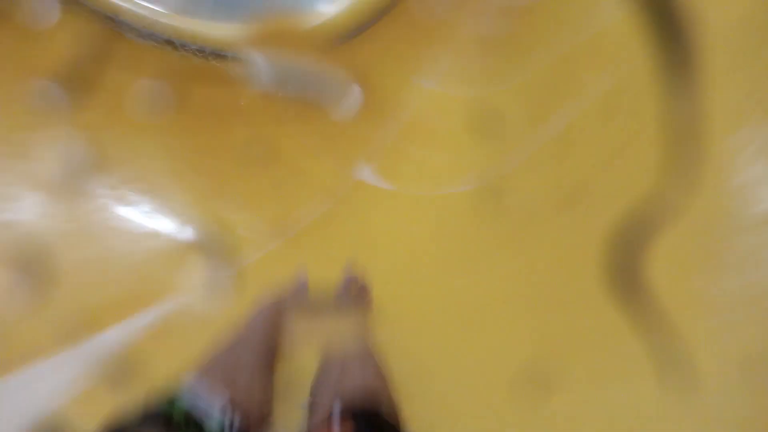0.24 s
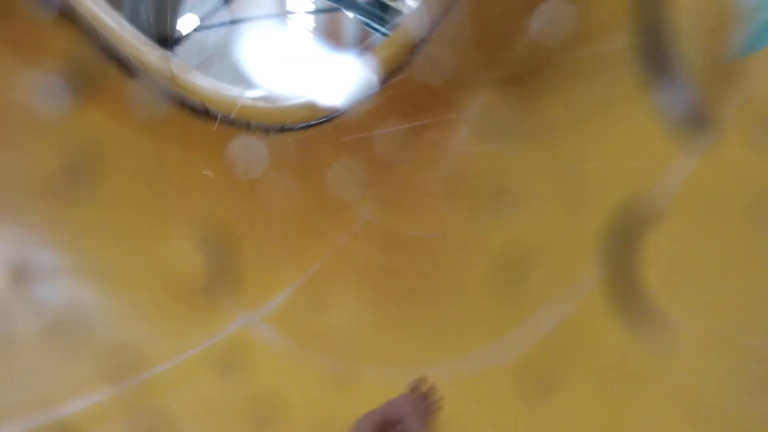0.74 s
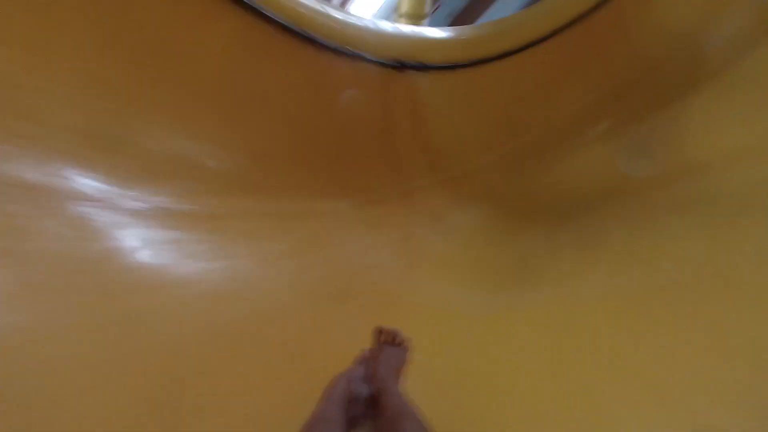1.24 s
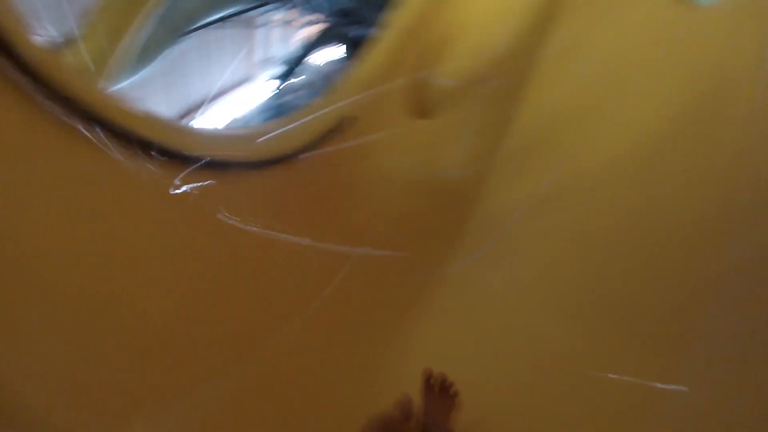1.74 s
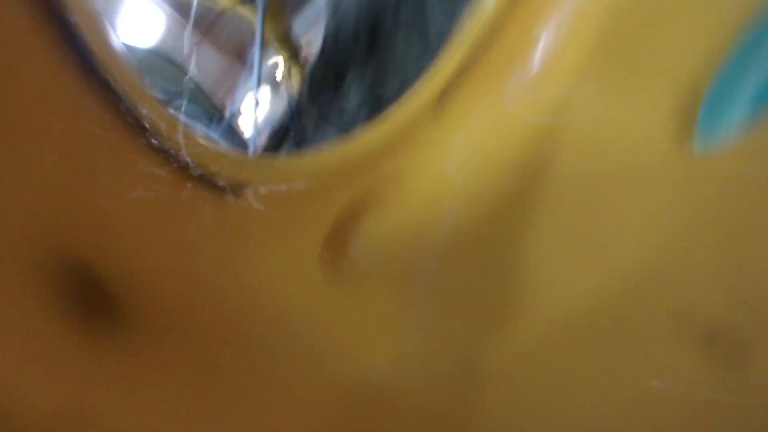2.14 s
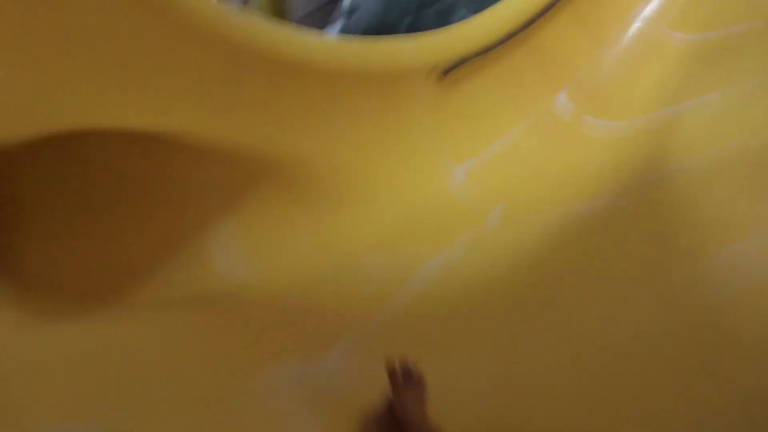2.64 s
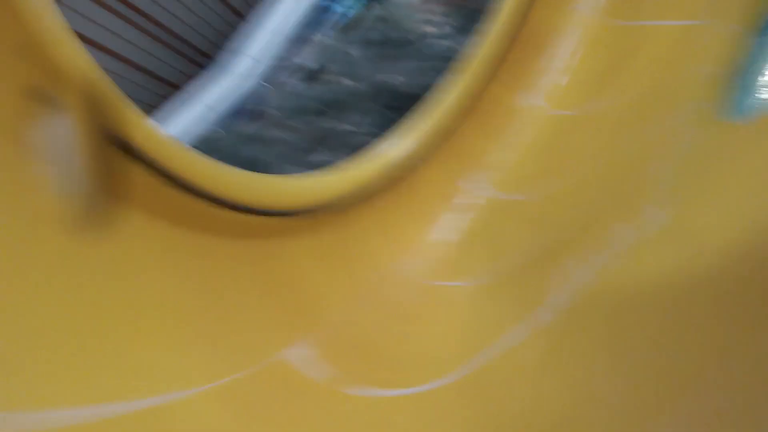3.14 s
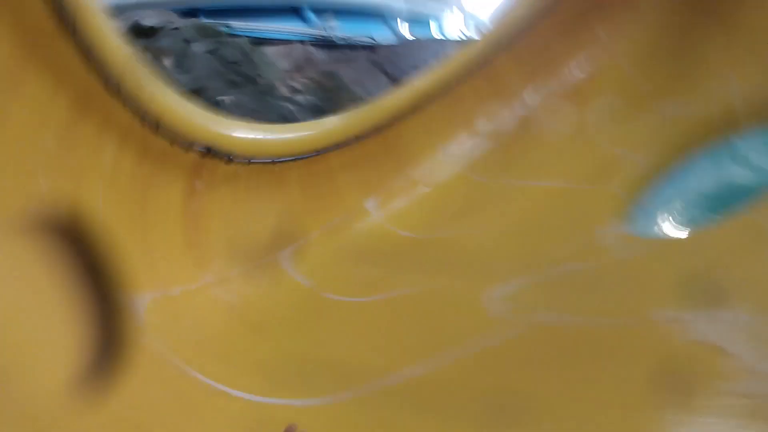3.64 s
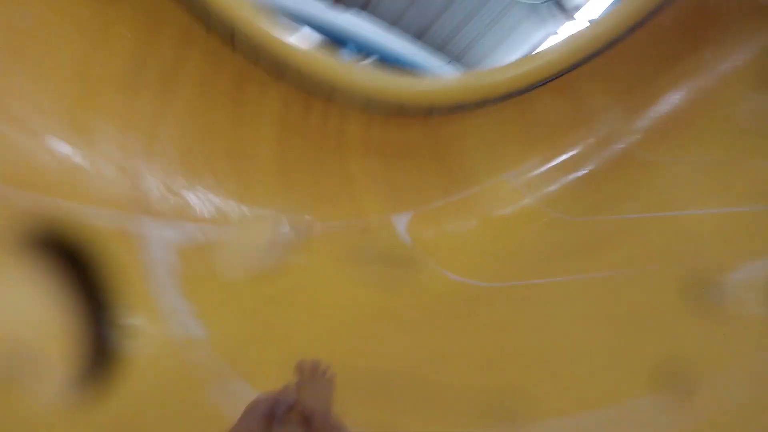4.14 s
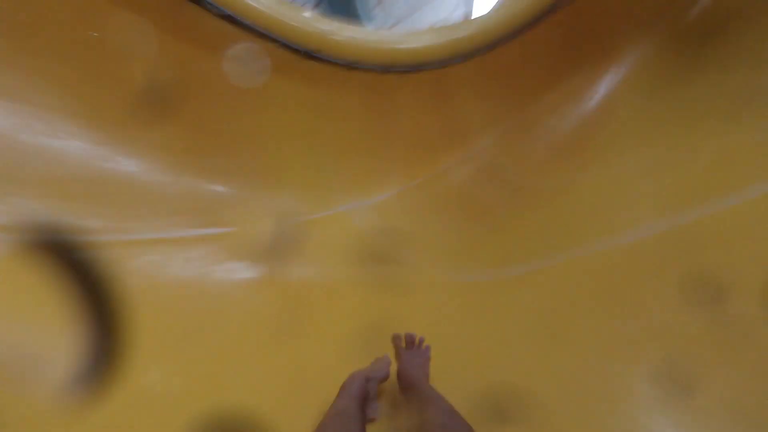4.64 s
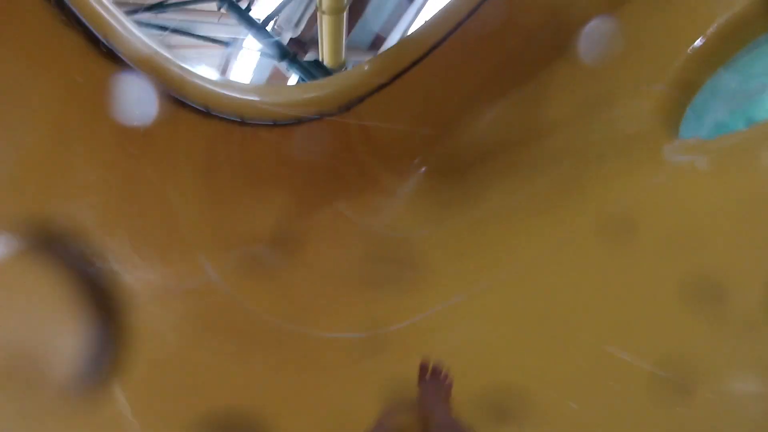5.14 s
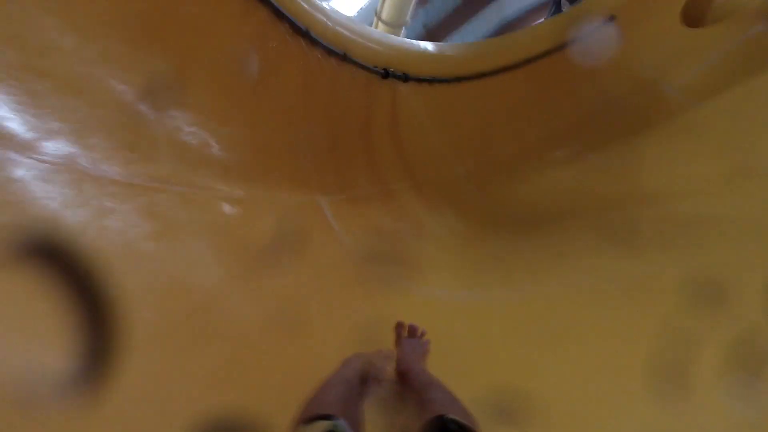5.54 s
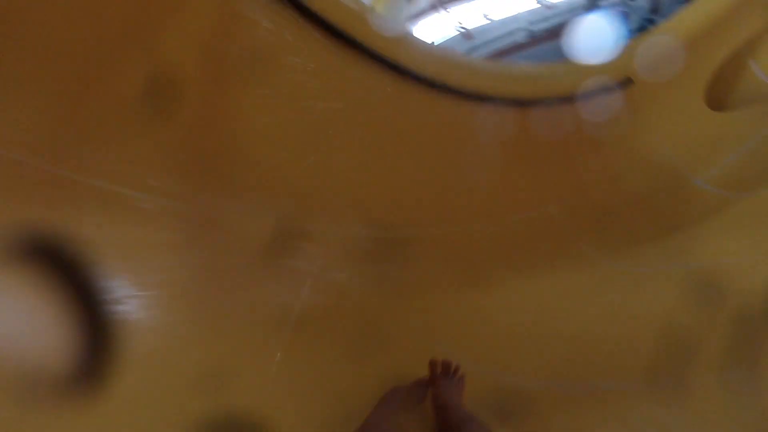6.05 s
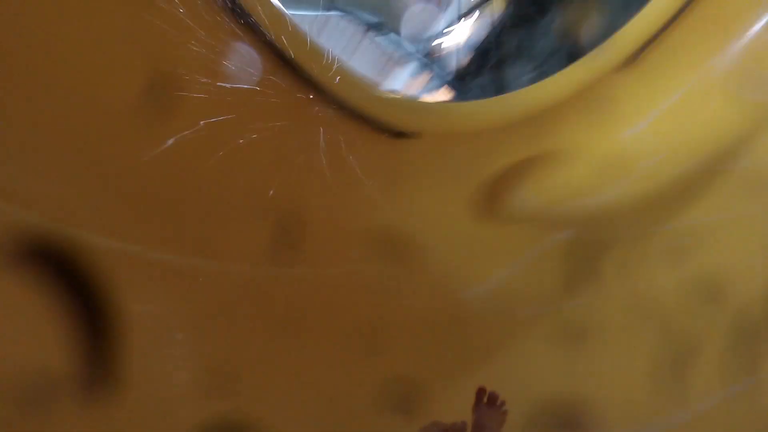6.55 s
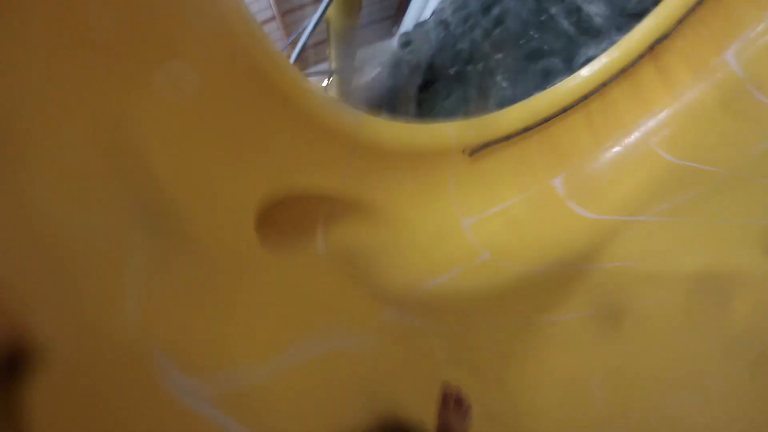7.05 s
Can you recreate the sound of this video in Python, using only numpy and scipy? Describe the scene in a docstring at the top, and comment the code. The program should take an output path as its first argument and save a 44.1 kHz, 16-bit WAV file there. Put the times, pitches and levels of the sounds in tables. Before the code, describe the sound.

A boxed-in microphone inside a sealed case rides round a plastic water-slide bowl; both channels are the same. Throughout, a faint muffled rush of water and a lumpy, very deep rumble rise and fall beneath fine ticking spray. A tight cluster of loud plastic smacks comes at 0.12-0.17 s, then mostly rumble, with a sharp knock at 0.9 and a barely audible thin whistle around 1.2-1.5. From 1.63 to 1.77 very hard, clipped pops strike, followed by scattered taps and a dense rattling flurry at 2.0-2.4. Heavy dull bumps land near 3.0 and 3.35. Light, sparse taps follow, a small clatter with a thump at about 5.0, and sharp pops around 5.4. Ticking spray thickens from 6 to 6.8, with a clear smack at 6.66 and hollow knocks clustering from 6.9 to 7.06, ending abruptly at about 7.3. Each hit is short, dry and hollow, momentarily pushing the background down.

```python
"""In a plastic water-slide bowl, a rider circles round holding a camera in a sealed housing.
Spray drops smack the housing and ring it: each is a short blow that sets off fading tones.
Behind them are a muffled rush of water (shaped noise), a deep rumble from the shaking ride (very slow
noise), a faint whistle, fine ticking spray and a few soft bumps. One microphone feeds both channels,
and a gain control turns loud moments down."""
import sys
import numpy as np
from scipy import signal
from scipy.fft import rfft, irfft
from scipy.io import wavfile
from scipy.ndimage import uniform_filter1d

SR = 44100
rng = np.random.default_rng(int(sys.argv[2]) if len(sys.argv) > 2 else 0)


def to_wav(s):
    """Save 16-bit WAV."""
    ch = np.atleast_2d(s).T  # columns
    pcm = np.round(np.clip(ch, -1, 1) * 32767)  # PCM
    wavfile.write(sys.argv[1], SR, pcm.astype(np.int16))


N = 321048  # length in samples


def gain_of(db):
    """Turn decibels into a plain multiplier."""
    return 10 ** (np.asarray(db) / 20)


def evened(x):
    """Scale a sound to an average (RMS) strength of 1."""
    return x / np.sqrt(np.mean(x ** 2) + 1e-20)


def peaked(x):
    """Scale a sound so that its largest swing is 1."""
    return x / abs(x).max()


def fading(t, t60_s):
    """Die away evenly in decibels, losing 60 dB in t60_s seconds."""
    return gain_of(-60 * t / t60_s)


def filtered(x, order, hz, kind):
    """Keep only the treble above hz ("high") or the range between two pitches ("band")."""
    return signal.sosfilt(signal.butter(order, hz, kind, fs=SR, output="sos"), x)


def read(points, hz):
    """Read a curve of (pitch, value) points at any pitch, evenly spaced in octaves."""
    point_hz, value = np.transpose(points)
    return np.interp(np.log(hz + 1), np.log(point_hz + 1), value)


def add(mix, start_s, sound):
    """Mix a sound in at its start time, cut off at the end of the scene."""
    part = mix[round(start_s * SR):][:len(sound)]
    part += sound[:len(part)]


def ride(column):
    """One column of the ride's course, joined by straight lines for every sample."""
    # how the ride goes: time_s, rush_db, rumble_db, specks_per_s (chance of fine spray)
    course = np.array([(0.0, -33, -17, 110), (0.2, -40, -10.5, 80), (0.7, -41, -21, 60),
                       (1.2, -43.5, -13, 45), (1.65, -40.5, -16.5, 48), (1.8, -44.5, -18, 23),
                       (1.95, -40.5, -21.5, 55), (2.3, -36, -10.5, 55), (2.6, -45, -15, 25),
                       (2.9, -42.5, -18, 80), (3.1, -40.5, -15, 43), (3.35, -45, -16, 50),
                       (3.75, -42.5, -17, 65), (4.4, -43, -16, 110), (4.9, -41.5, -16.5, 90),
                       (5.2, -45.5, -15, 22), (5.7, -43, -18.5, 34), (6.1, -42.5, -19.5, 130),
                       (6.8, -41, -16, 150), (7.05, -40, -17.5, 30), (7.28, -45.5, -18, 15)])
    return np.interp(np.arange(N) / SR, course[:, 0], course[:, column])


def rumble():
    """The shaking ride makes lumpy, very deep pressure swings; the membrane stiffens on the largest."""
    # tone colour of the shaking: pitch_hz, relative level_db (per Hz)
    colour = [(2.4, -51), (4, -2), (15, -6.5), (25, -9), (36, -16), (48, -30), (70, -43), (130, -49),
              (290, -110)]
    hz = np.fft.rfftfreq(N, 1 / SR)
    noise = rng.standard_normal(N)
    swing = evened(irfft(rfft(noise) * gain_of(read(colour, hz)), N))
    lopsided = swing - 0.011 * (swing ** 2 - 1)  # dips are sharper than crests
    stiffened = 2 * np.tanh(0.5 * lopsided)
    return gain_of(ride(column=2)) * stiffened


def rush():
    """Rushing water is noise built from random short-time spectra, lifted where the air resonates."""
    # tone colour of the water: pitch_hz, relative level_db (per Hz)
    colour = [(60, -35), (100, -10), (200, -7), (400, -14), (800, -16), (1200, -15), (2500, -15),
              (4500, -20.5), (7500, -25), (14400, -34.5), (16000, -72)]
    # resonances of the air in the housing: pitch_hz, width_hz, lift_db
    air_peaks = [(1505, 244, 12.5), (2168, 420, 8), (3300, 440, 3), (5690, 1200, 6)]
    frames, hz = N // 256 + 5, np.fft.rfftfreq(1024, 1 / SR)
    real, imaginary, grain = rng.standard_normal((frames, 513, 3)).T  # each: pitch by time

    # wide flicker changes at every frame; narrower patches drift over several frames
    flicker = evened(uniform_filter1d(grain, size=120, axis=0))
    narrow = uniform_filter1d(grain, size=12, axis=0)
    patches = evened(uniform_filter1d(narrow, size=8, axis=1))

    colour_db = read(colour, hz)
    for peak_hz, width_hz, lift_db in air_peaks:
        colour_db = colour_db + lift_db / (1 + (2 * (hz - peak_hz) / width_hz) ** 2)
    level_db = colour_db[:, None] + 1.18 * patches + 1.82 * flicker
    spectra = (real + 1j * imaginary) * gain_of(level_db)
    water = signal.istft(spectra, nperseg=1024, noverlap=768)[1][:N]
    return gain_of(ride(column=1)) * evened(water)


def whistle():
    """A faint fuzzy tone: slow noise carried on a gliding pitch."""
    # course of the tone: time_s, level_db, pitch_hz
    glide = [(1.15, -55, 3280), (1.35, -47.5, 3240), (1.52, -50, 3200)]
    time_s, level_db, pitch_hz = np.transpose(glide)
    t, out = np.arange(time_s[0], time_s[-1], 1 / SR), np.zeros(N)
    fuzz = evened(uniform_filter1d(rng.standard_normal(len(t)), size=300))
    cycles = np.cumsum(np.interp(t, time_s, pitch_hz)) / SR
    level = gain_of(np.interp(t, time_s, level_db))
    add(out, time_s[0], level * fuzz * np.sin(2 * np.pi * cycles))
    return out


def bumps():
    """In each bump of the ride a quick wiggle arrives first and slows into one broad swing."""
    # bumps: swing_s (during the main swing), peak_db, pitch_hz (sets its speed), way (up +1, down -1)
    bump_list = [(0.306, -20, 47, -1), (0.437, -21.5, 47.4, -1), (1.101, -17.5, 54, -1),
                 (1.095, -22.5, 227, -1), (1.513, -16.5, 34, -1), (2.139, -16.5, 140, -1),
                 (2.292, -12, 172, -1), (2.528, -13.5, 42, -1), (2.977, -5.5, 52.5, -1),
                 (3.143, -16.5, 35, -1), (3.329, -16.5, 78, 1), (3.362, -6, 38.6, -1),
                 (4.472, -20.5, 64, -1), (4.996, -7.5, 204, -1), (5.035, -20, 195, -1),
                 (5.307, -24, 35.4, -1), (5.371, -21.5, 177, -1), (5.41, -19.5, 195, -1),
                 (6.477, -26, 101, 1), (7.065, -27, 203, -1), (7.107, -21, 47.4, -1)]
    out = np.zeros(N)
    for swing_s, peak_db, pitch_hz, way in bump_list:
        u = np.arange(0, 4, pitch_hz / SR)  # time counted in cycles of pitch_hz
        wiggle = np.sin(2 * np.pi * 1.74 * u ** 0.65)  # the power below 1 slows it down
        swell = u ** 2.5 * np.exp(-4.2 * u)
        add(out, swing_s - 0.488 / pitch_hz, np.sign(way) * gain_of(peak_db) * peaked(wiggle * swell))
    return out


def housing(hz, octaves=0.19):
    """Ring of the shell; modes near the favoured pitch ring hardest, pulled towards it by the wet spot."""
    # natural tones of the shell: pitch_hz, relative level_db, t60_s (time to fade by 60 dB)
    modes = [(714, -17, 0.015), (1110, -8.5, 0.051), (1530, 13.5, 0.011), (2080, 28, 0.0035),
             (2476, 28.5, 0.0041), (2920, 10, 0.0072), (3900, -26, 0.0046), (5700, -5, .004)]
    t, ring = np.arange(1200) / SR, 0
    for mode_hz, level_db, t60_s in modes:
        near = gain_of(-6 * abs(np.log2(mode_hz / hz)) / octaves)  # 1 at the favoured pitch
        pulled_hz = mode_hz * (hz / mode_hz) ** near
        tone = np.sin(2 * np.pi * pulled_hz * t) * fading(t, t60_s)
        ring = ring - near * gain_of(level_db) * tone
    return ring


def specks():
    """Fine spray strikes the shell in short thin ticks of unequal size that come in showers."""
    struck = rng.random(N) < ride(column=3) / SR
    size = struck * gain_of(3.95 * np.minimum(rng.exponential(1, N), 4))
    kind = rng.integers(0, 4, N)  # which of four ticks each speck makes
    t = np.arange(1200) / SR
    short = (1 - np.exp(-t / 0.00021)) * fading(t, 0.0083)
    out = np.zeros(N)
    for k, pitch_hz in enumerate((1500, 1950, 2530, 3980)):
        tick = short * housing(pitch_hz, octaves=0.69)
        out += signal.oaconvolve(size * (kind == k), tick)[:N]
    return gain_of(-64) * out


def drop(noise, ring_db, pitch_hz, push_db, fizz_db):
    """A blow and its spreading splash ring the shell, press the membrane in and crackle."""
    t = np.arange(len(noise)) / SR

    # a 0 dB drop splashes for 11 ms; each 27 dB harder halves that
    splash_t60_s = 0.011 * 0.5 ** (ring_db / 27)
    splash = noise * (1 - np.exp(-t / 0.00027)) * fading(t, splash_t60_s)
    blow = t / 0.00006 * np.exp(1 - t / 0.00006) + 0.73 * splash
    ring = signal.oaconvolve(blow, housing(pitch_hz))[:len(t)]
    ring = peaked(filtered(ring, 2, 0.43 * pitch_hz, "high"))  # a small patch moves little bass

    # the membrane: a quick push inwards, a slower swing back and a brief wobble
    u = t / 0.00043
    inwards = u * np.exp(1 - u)
    back = 0.598 * u / 1.636 * np.exp(1 - u / 1.877)
    wobble = np.sin(2 * np.pi * 650 * t) * fading(t, 0.0075)
    push = peaked(back - inwards - 0.31 * wobble)

    fizz = filtered(splash, 1, [3500, 6500], "band")
    fizz = fizz / np.sqrt(uniform_filter1d(fizz ** 2, size=30).max())  # loudest stretch set to 1
    return gain_of(ring_db) * ring + gain_of(push_db) * push + gain_of(fizz_db) * fizz


def drops():
    """All the distinct drops that hit the housing, each with its own random splash."""
    # drops: start_s, ring_db, pitch_hz (the pitch it favours), push_db, fizz_db
    drop_list = [(0.1179, 2.5, 2880, 5, -19), (0.1514, -8, 2860, -3, -18.5), (0.1581, -2.5, 1490, -27, -22),
                 (0.163, 1, 2000, -28, -24), (0.1654, 2.5, 1950, -4.5, -14), (0.895, 0, 1540, -1, -38),
                 (0.8978, -14.5, 700, -42, -20.5), (1.318, -22.5, 2410, -54, -50),
                 (1.6286, -15, 2600, -49, -50), (1.6425, 4, 1450, 1.5, -17.5), (1.686, -13, 1650, -42, -32),
                 (1.7097, -13, 1900, -18.5, -30), (1.7334, 14, 2560, -8.5, -23),
                 (1.741, 11.5, 1880, 9.5, -3), (1.7445, -52, 2000, -5, -15), (1.751, -8, 1990, -6, -28),
                 (1.7689, -5.5, 1300, -2.5, -23), (1.7724, -12, 2600, -19, -32),
                 (1.8571, -3.5, 2330, -8.5, -33), (1.869, -17, 2310, -40, -35),
                 (1.904, -22.5, 2290, -50, -35), (2.0121, -21, 1640, -25.5, -31),
                 (2.0531, -12.5, 1670, -26, -38), (2.063, -21, 2200, -46, -49),
                 (2.0812, -22, 2500, -32, -41), (2.1055, -9, 1660, -17, -35),
                 (2.1132, -5.5, 1560, -11, -25), (2.1643, -0.5, 2400, -2, -29),
                 (2.1782, -8, 2670, -31, -33), (2.1863, -15, 2120, -45, -41), (2.2365, 1, 2080, 3.5, -11.5),
                 (2.241, -1.5, 2230, -10, -36), (2.252, 3.5, 1980, -10, -20),
                 (2.278, -15, 2030, -38, -19.5), (2.2827, -10, 2530, -32, -29),
                 (2.3011, -3, 1500, 1, -23.5), (2.309, -14, 2050, -36, -36), (2.3195, 3.5, 1560, -3.5, -29),
                 (2.3342, -7, 1440, -19, -20), (2.3482, 0.5, 1530, -23, -45), (2.3536, 1, 2000, 7.5, -31),
                 (2.3702, -1, 1500, 1, -51), (2.3807, -1.5, 2000, -4.5, -23), (2.385, -11, 2000, -12, -31),
                 (3.3254, -23.5, 1110, -25.5, -46), (3.5831, -15, 1850, -37, -32.5),
                 (3.5912, -14.5, 1730, -28, -42), (3.646, -19.5, 1920, -58, -36),
                 (3.7601, -19, 1670, -21, -33), (4.119, -15, 2930, -47, -38.5),
                 (4.2746, -20.5, 2350, -63, -40), (4.4441, -22.5, 2500, -36, -51),
                 (4.5112, -6.5, 1570, -56, -23.5), (4.723, -21, 2700, -59, -36.5),
                 (4.9358, -26, 1450, -17, -59), (4.96, -11, 2030, -24, -65), (4.972, -12, 1380, -40, -56),
                 (4.995, -13, 2600, -12.5, -32), (4.9991, -2, 2500, -16, -13.5),
                 (5.0102, -13, 4410, -13, -10.5), (5.032, -7.5, 1570, -14.5, -20),
                 (5.3666, 3.5, 2040, -12, -62), (5.3876, -2, 2680, -9, -23.5),
                 (5.395, -12.5, 1770, -40, -40), (5.411, -20, 2410, -21, -33),
                 (6.0487, -23.5, 2610, -51, -38), (6.1313, -19, 2220, -49, -35.5),
                 (6.172, -8, 2570, -52, -54), (6.396, -22, 2540, -52, -39), (6.4466, -11.5, 2520, -58, -44),
                 (6.53, -24, 2600, -56, -46), (6.6182, -18.5, 1530, -47, -40), (6.657, 4, 2300, -5.5, -39),
                 (6.7015, -7.5, 2300, -23, -27), (6.884, -18, 2210, -17, -35),
                 (6.893, -0.5, 1500, -24, -43), (6.8976, -3, 1190, -11, -22), (6.9049, -13, 2620, -20, -28),
                 (6.959, -23, 1870, -25, -42), (6.9734, -22, 2200, -39, -35),
                 (7.0135, -6.5, 1390, -20, -25), (7.0162, -6.5, 1190, -27, -29),
                 (7.0449, -1.5, 1530, -9.5, -25), (7.0626, 0, 1950, 3, -8.5)]
    out = np.zeros(N)
    noises = rng.standard_normal((len(drop_list), 1500))
    for noise, (start_s, *settings) in zip(noises, drop_list):
        add(out, start_s, drop(noise, *settings))
    return out


def scene():
    """Everything reaches one microphone, which feeds both channels."""
    mono = rumble() + rush() + whistle() + bumps() + specks() + drops()
    return np.array([mono, mono])


def record(dry):
    """Gain control, deaf to the deepest bass, ducks just after loud moments; peaks clip; treble is cut."""
    deaf_below_hz, knee_db, recovery_db_per_s = 28, -14.5, 42
    squeeze = 0.8  # share of the excess that is taken off
    reaction_s, edge_hz = 0.006, 16200

    heard = filtered(np.clip(dry[0], -1, 1), 2, deaf_below_hz, "high")
    power = signal.lfilter(np.ones(350) / 350, 1, heard ** 2)  # average of the last 350 samples
    level_db = 10 * np.log10(power + 1e-9)

    # hold each loud moment, then let it sink at the steady recovery rate
    fall_db = np.arange(N) * recovery_db_per_s / SR
    held_db = np.maximum.accumulate(level_db + fall_db) - fall_db
    over_db = np.maximum(held_db - knee_db, 0)
    lag = np.exp(-1 / (reaction_s * SR))
    late_db = signal.lfilter([1 - lag], [1, -lag], over_db)
    ducked = dry / gain_of(squeeze * late_db)

    clipped = np.clip(ducked, -1, 1)
    rounded = signal.lfilter([0.8], [1, 0.8 - 1], clipped)  # the top octave rolls off
    edge = signal.firwin(255, edge_hz, window=("kaiser", 9), fs=SR)  # little passes above edge_hz
    return 0.97 * signal.oaconvolve(rounded, edge[None], "same")


dry = scene()
out = record(dry)
to_wav(out)
```